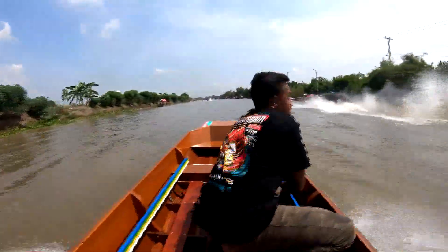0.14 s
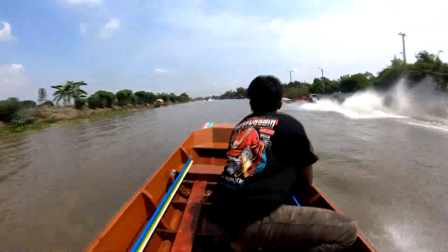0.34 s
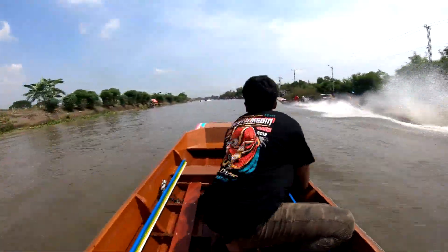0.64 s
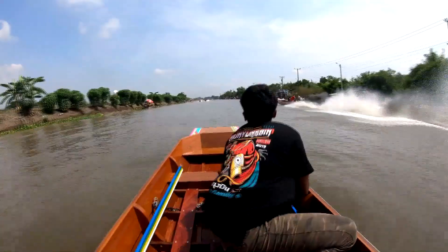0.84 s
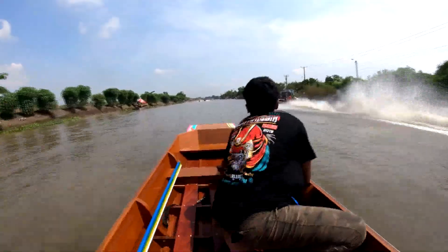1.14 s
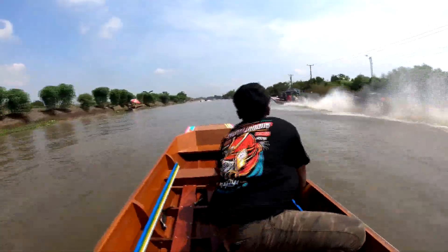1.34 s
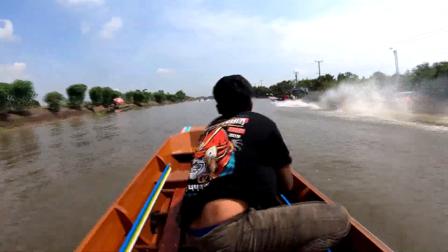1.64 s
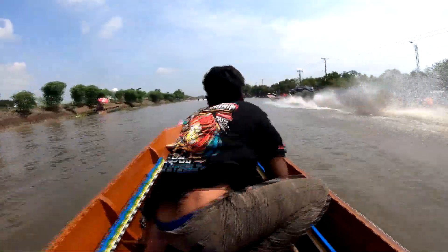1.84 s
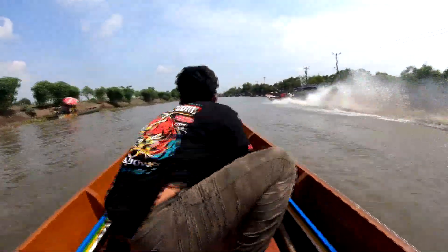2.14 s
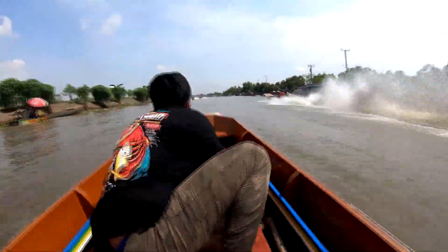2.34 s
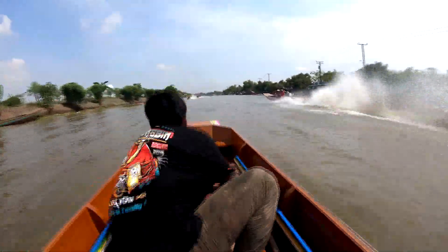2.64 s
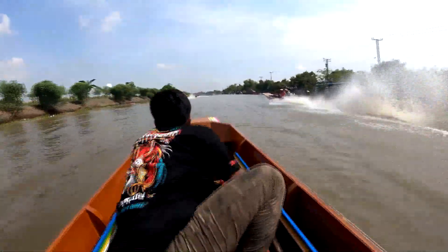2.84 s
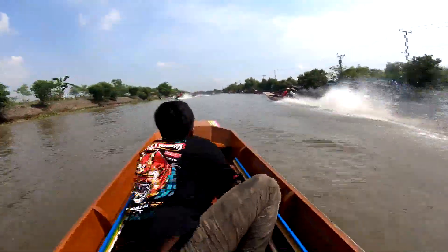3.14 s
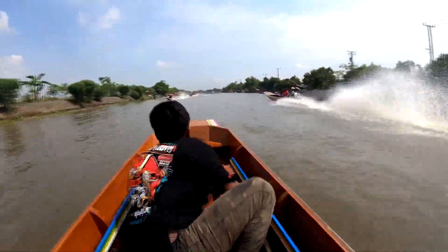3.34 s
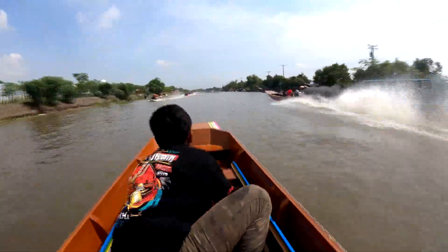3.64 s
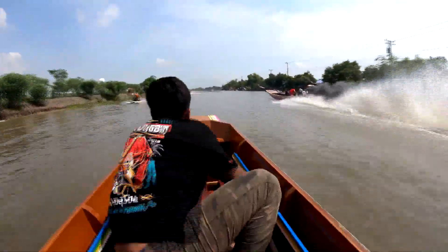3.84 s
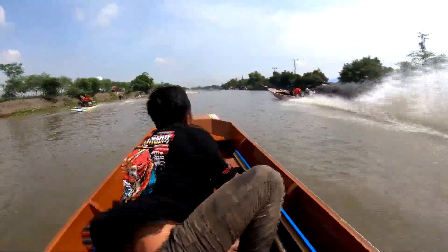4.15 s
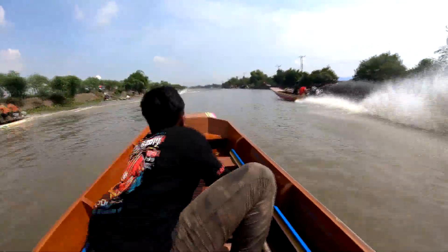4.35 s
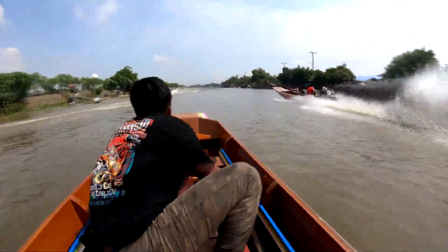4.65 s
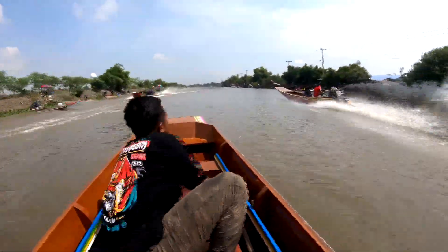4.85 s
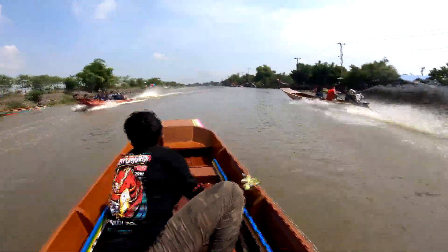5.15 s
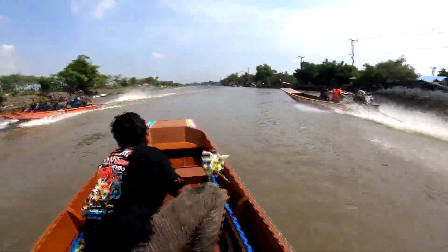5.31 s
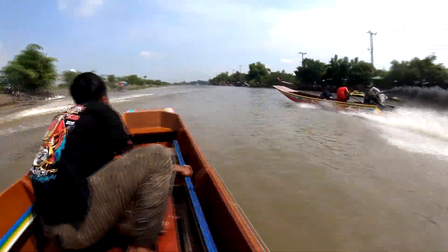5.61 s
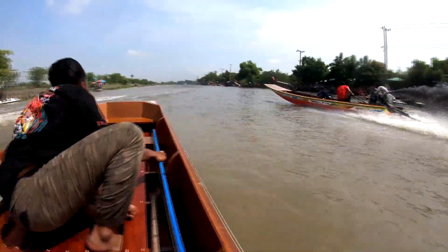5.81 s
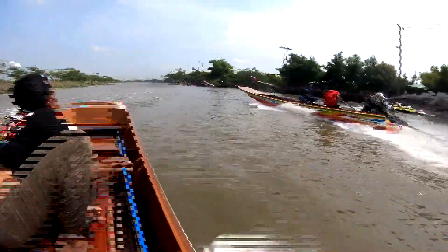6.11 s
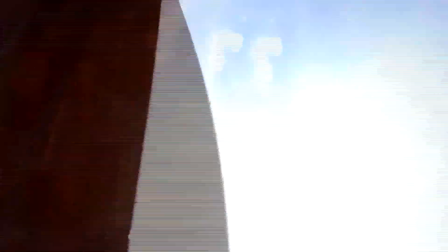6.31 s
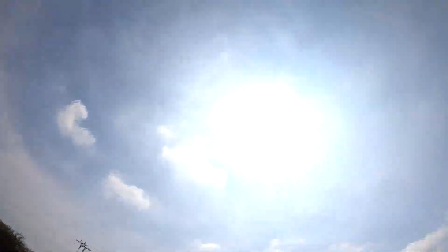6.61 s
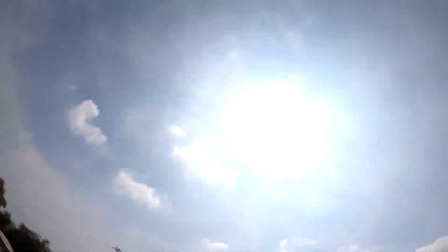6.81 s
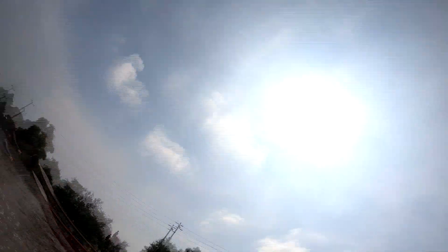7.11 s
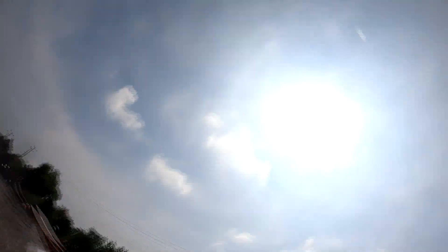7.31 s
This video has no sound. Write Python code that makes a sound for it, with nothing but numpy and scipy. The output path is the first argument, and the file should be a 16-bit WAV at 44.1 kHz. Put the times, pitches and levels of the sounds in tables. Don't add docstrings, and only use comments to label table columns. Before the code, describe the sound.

Close onboard microphone in an open wooden boat on a river. The engine climbs quickly in pitch and settles into a low, rough drone while a rival's higher buzz fades at once. Wind buffets and splutters, spray hisses in bursts, and hard clicks tick every half second. Near the end a wave knocks the microphone, the engine sags and fades, and wind roar and wash remain.

```python
import sys
import numpy as np
from scipy import signal
from scipy.fft import rfft, irfft, next_fast_len
from scipy.io import wavfile
from scipy.ndimage import uniform_filter1d, minimum_filter1d, map_coordinates

SR = 44100
rng = np.random.default_rng(int(sys.argv[2]) if len(sys.argv) > 2 else 0)


def generate_wav(signal):
    frames = np.transpose(np.atleast_2d(signal))
    scaled = np.clip(frames, -1, 1) * 32767
    pcm = np.round(scaled).astype(np.int16)
    wavfile.write(sys.argv[1], SR, pcm)


def magnitude_from_level(level_db):
    exponent = np.asarray(level_db, float) / 20
    return 10 ** exponent


N = 329427

# (time [s], roar level [dB])
WIND = [(0, -44.5), (.4, -44.5), (.65, -38), (1.1, -38.5), (1.55, -41), (2.15, -37.5), (2.65, -39.5),
        (3.0, -38.5), (3.5, -34.5), (4.1, -35.5), (4.65, -35.5), (5.15, -36.5), (5.5, -35), (6.1, -39.5),
        (6.57, -34), (6.85, -30.5), (7.1, -35), (7.47, -34.5)]
# (time [s], level [dB], share torn into mist [dB])
WATER = [(0, -46, -1.5), (.45, -43, -7.5), (.6, -39, -9.5), (1.5, -42, -7.5), (2.12, -40.5, -10),
         (2.5, -47, -10.5), (2.95, -48, -7.5), (3.45, -49.5, -3), (4.02, -52, -4), (4.43, -46, -9),
         (4.74, -45.5, -8), (5.01, -41.5, -9), (5.53, -37.5, -9), (5.8, -40.5, -5), (6.2, -40.5, -10.5),
         (6.9, -39, -15.5), (7.41, -35, -14.5), (7.47, -42, -7)]
# (time [s], frequency [Hz])
EDGE = [(0, 7500), (2.7, 7160), (2.95, 4098), (4.1, 4079), (4.4, 4540), (4.75, 4600), (4.95, 7070),
        (5.65, 7360), (5.8, 5810), (6.2, 5260), (6.7, 4383), (7.17, 3740), (7.19, 4525), (7.3, 4660),
        (7.47, 4460)]
# (frequency [Hz], density [dB per Hz])
FLUTTER = [(100, -34.5), (170, 0), (269, -6.5), (381, -13.5), (501, -25), (549, -38), (600, -37),
           (780, -64), (1320, -120)]
# (frequency [Hz], density [dB per Hz])
HOUSING = [(330, -37.5), (560, -30), (618, -4.5), (766, 0.5), (948, -4.5), (1120, -18), (1240, -8.5),
           (1420, -5.5), (1760, -5), (2570, -13), (2810, -18), (4000, -19), (5200, -47), (8800, -120)]
# (frequency [Hz], density [dB per Hz])
SPRAY = [(1650, -30), (2800, -7), (3170, -9), (3810, -3.5), (4080, -2.5), (4740, -3.5), (6040, -4),
         (7600, -12), (9880, -39), (16700, -120)]
MEAN_WIND_DB = -38
SHELTER_S, SHELTER_DB, SHELTER_IN_S, SHELTER_OUT_S = (6.2, 6.42), -9.5, .015, .05


def unit(x):
    return x / np.sqrt(np.mean(x ** 2) + 1e-20)


def along(points, hz):
    f, v = np.transpose(points)
    return np.interp(np.log(hz + 1), np.log(f + 1), v)


def curves(rows):
    s, *cols = np.transpose(rows)
    return [np.interp(np.arange(N) / SR, s, c) for c in cols]


def wobble(rate):
    at = np.arange(0, N + 32, 32)
    knots = rng.standard_normal(int(N * rate / SR) + 4)
    return np.interp(np.arange(N), at, map_coordinates(knots, [at * rate / SR]))


def coloured(x, spectrum):
    m = next_fast_len(len(x) + 8192)
    response = magnitude_from_level(along(spectrum, np.fft.rfftfreq(m, 1 / SR)))
    return irfft(rfft(x, m) * response, m)[:len(x)]


def rush(spectrum, patchy_db):
    z = signal.stft(rng.standard_normal(N), nperseg=512)[2]
    field = uniform_filter1d(rng.standard_normal(z.shape), size=8, axis=0)
    field = uniform_filter1d(field, size=6, axis=1)
    patches = signal.istft(z * magnitude_from_level(patchy_db * unit(field)), nperseg=512)[1][:N]
    return unit(coloured(patches, spectrum))


def between(start_s, end_s, in_s, out_s):
    t = np.arange(N) / SR
    return np.clip((t - start_s) / in_s, 0, 1) * np.clip(1 - (t - end_s) / out_s, 0, 1)


def shelter_db():
    return SHELTER_DB * between(*SHELTER_S, SHELTER_IN_S, SHELTER_OUT_S)


def edge_octaves(s):
    return np.log2(np.interp(s, *np.transpose(EDGE)) / 4000)


def rival():
    # (time [s], exhaust frequency [Hz], level [dB])
    exhaust = [
        (0, 313, -31),
        (.1, 294.3, -32),
        (.26, 283, -26.5),
        (.32, 268, -52),
        (.45, 276, -68),
    ]
    hz, level_db = curves(exhaust)
    turn = 2 * np.pi * np.cumsum(hz) / SR
    return magnitude_from_level(level_db + 2) * (np.sin(turn) + magnitude_from_level(-17) * np.sin(3 * turn / 2))


def water():
    # (frequency [Hz], density [dB per Hz])
    mist_spectrum = [(3500, -30), (4300, 3.5), (6000, -5), (7300, -8), (7700, -2), (8500, -6), (8800, -10),
                     (9700, -13.5), (10300, -25.5), (11500, -26.5), (13000, -48.5)]
    spray_loss_db, spray_back_s = -10.5, 0.25
    spray_db, share_db = curves(WATER)
    turned = between(SHELTER_S[0], SHELTER_S[0] + SHELTER_IN_S, SHELTER_IN_S, spray_back_s)
    spray_db = spray_db + spray_loss_db * turned
    mist_db = spray_db + share_db
    spray = unit(magnitude_from_level(1.3 * wobble(7.4) + 1.3 * wobble(30)) * rush(SPRAY, patchy_db=1.0))
    hz, t, z = signal.stft(magnitude_from_level(spray_db + 2.5) * spray, SR, nperseg=512)
    edge_hz = np.interp(t, *np.transpose(EDGE))
    spray = signal.istft(z / (1 + (hz[:, None] / edge_hz) ** 40), SR, nperseg=512)[1][:N]
    mist = unit(magnitude_from_level(wobble(25) + wobble(9.9)) * rush(mist_spectrum, patchy_db=2))
    return spray + magnitude_from_level(mist_db) * mist


def sheets():
    # (time [s], peak level [dB], length [s])
    sheet_events = [(0.085, -30, 0.01), (0.25, -32.5, .033), (0.548, -37, .23), (.984, -33, 0.048),
                    (1.045, -33.5, 0.036), (1.153, -34, 0.018), (1.437, -34.5, 0.041), (1.566, -31, 0.066),
                    (1.654, -33, 0.1), (1.819, -29, 0.045), (2.029, -33, .037), (2.226, -41, 0.015),
                    (3.1, -38.5, 0.021), (3.28, -40.5, .03), (3.774, -45, .057), (4.074, -36, .03),
                    (4.263, -36.5, 0.022), (4.33, -37.5, 0.029), (4.46, -41, .015), (4.762, -37.5, .02),
                    (4.835, -29, 0.0076), (4.877, -35, .012), (5.923, -37, .037), (6.136, -35, 0.021),
                    (6.85, -45, .015), (6.925, -49, .06), (7.197, -32.5, 0.014), (7.204, -44, 0.12),
                    (7.302, -51, 0.25)]
    # (time [s], peak level [dB], length [s], centre [Hz])
    veils = [
        (.3, -62, .3, 9800),
        (0.545, -53, 0.23, 11500),
        (6.187, -42, .012, 9200),
        (6.188, -23, .012, 5060),
        (6.19, -25.5, .01, 2570),
        (7.23, -60, .13, 10300),
        (7.192, -39.5, 0.25, 5170),
    ]
    sheet_hz, sheet_follows = 5500, 0.026
    out = np.zeros(N + SR)

    def centre_hz(s):
        return sheet_hz * (1 + sheet_follows * (np.interp(s, *np.transpose(WATER)[:2]) + 44))

    for s, db, length, hz in [(*row, centre_hz(row[0])) for row in sheet_events] + veils:
        u = np.linspace(0, 1, round(length * SR))
        band = [(hz * .5, -90), (hz * .7, -25), (hz * .88, -3), (hz, 0),
                (hz * 1.15, -4), (hz * 1.4, -30), (hz * 1.7, -110)]
        hiss = unit(coloured(rng.standard_normal(len(u) + 2048), band))[:len(u)]
        out[round(s * SR):][:len(u)] += magnitude_from_level(db - 4.5) * np.sin(np.pi * u ** .6) * hiss
    return out[:N]


def slaps():
    # (time [s], peak level [dB])
    slap_events = [(1.2165, -21), (1.9665, -22), (2.0617, -20), (2.1813, -19.5), (2.2123, -25),
                   (2.279, -30), (3.722, -15.5), (3.7469, -22), (3.7961, -21), (3.8448, -23), (3.883, -23),
                   (3.905, -14), (3.948, -15.5), (4.003, -27), (4.045, -24), (4.079, -15), (4.132, -18.5),
                   (4.1662, -25), (4.2267, -23), (4.344, -25), (4.548, -28), (4.6671, -19), (4.6997, -21),
                   (4.746, -24), (6.19, -18.5), (6.554, -22), (6.5822, -23), (6.635, -22), (6.6892, -24),
                   (6.7486, -21)]
    # (frequency [Hz], gain [dB])
    slap_colour = [(500, -6.5), (1200, -2), (1800, 1.5), (3000, 1), (4500, -2)]
    # (frequency [Hz], gain [dB])
    wet_colour = [(4500, 1), (6000, -4), (7500, -19)]
    rise_s = .002
    wet_db, wet_per_octave_db = -26.5, 23.5
    patter_rate, patter_over_roar_db = 5.5, 5.5
    low, high = np.zeros(N + SR), np.zeros(N + SR)
    t = np.arange(SR // 25) / SR
    when, size = rng.random((60, 2)).T
    when = np.cumsum(-np.log(1 - when)) / patter_rate
    exposed_db = curves(WIND)[0] + 2 * shelter_db()
    patter_db = np.interp(when * SR, np.arange(N), exposed_db) + patter_over_roar_db + 6 * size
    patter = [row for row in zip(when, patter_db) if row[0] < N / SR]
    for s, db in slap_events + patter:
        treble_db = wet_db + wet_per_octave_db * edge_octaves(s)
        puff = magnitude_from_level(db) * (t / rise_s * np.exp(1 - t / rise_s)) ** 2
        low[round(s * SR):][:len(t)] += puff
        high[round(s * SR):][:len(t)] += puff * magnitude_from_level(treble_db)
    flap = uniform_filter1d(low[:N], size=600) * magnitude_from_level(shelter_db()) * rush(FLUTTER, patchy_db=-3)
    body = coloured(low[:N] * rush(HOUSING, patchy_db=1.0), slap_colour)
    wet = coloured(high[:N] * rush(SPRAY, patchy_db=3.0), wet_colour)
    return magnitude_from_level(-5) * body + magnitude_from_level(-3.0) * wet + magnitude_from_level(14.5) * flap


def wind():
    # (frequency [Hz], density [dB per Hz])
    buffet_spectrum = [(12, -42.5), (20, -4), (69, 3), (113, 2), (135, 1.5), (162, -9), (190, -7.5),
                       (250, -30), (420, -120)]
    # (time [s], level over the steady wind [dB], half width [s])
    gusts = [(.33, -5.5, 0.029), (.475, 12, .02), (0.529, -5.5, 0.033), (.6, 2.5, .02), (1.41, 4, 0.027),
             (1.8, -2.5, 0.027), (1.84, 3.5, 0.03), (2.121, 4, 0.025), (2.21, 8.5, 0.027),
             (2.291, 4.5, 0.017), (2.68, -5.5, 0.032), (3.49, 16, 0.013), (3.8, 4, 0.13), (4.21, -4, .05),
             (4.36, -7.5, .03), (4.41, 3.5, 0.041), (4.7, -3, 0.15), (4.83, 4, 0.028), (4.9, -5, 0.023),
             (4.96, 1, 0.018), (5.12, 3.5, 0.013), (5.19, -4.5, 0.06), (5.8, 5.5, 0.44),
             (6.605, -6.5, 0.012), (6.67, 4, .03), (6.714, -8, .01), (6.79, -5, 0.014), (6.85, 0.5, .03),
             (7.225, -4, 0.015), (7.44, 2, 0.023)]
    buffet_mean_db, buffet_grows, buffet_gusts = -15.5, 0.2, .6
    flutter_mean_db, flutter_grows, flutter_shelter = -21, 0.67, 1.05
    roar_gusts, roar_lulls = 0.21, 0.48
    strength_db, = curves(WIND)
    over_mean_db = strength_db - MEAN_WIND_DB
    t = np.arange(0, N / SR, 1 / 500)
    bumps_db = sum(db * np.exp(-((t - s) / width) ** 2) for s, db, width in gusts)
    gust_db, = curves(np.transpose([t, bumps_db]))
    buffet_db = buffet_mean_db + buffet_grows * over_mean_db + buffet_gusts * gust_db + shelter_db()
    flutter_db = flutter_mean_db + flutter_grows * over_mean_db + gust_db + flutter_shelter * shelter_db()
    roar_db = strength_db + np.where(gust_db > 0, roar_gusts, roar_lulls) * gust_db + shelter_db()
    eddy = wobble(22) + wobble(50)
    buffet = unit(magnitude_from_level(0.94 * wobble(11)) * rush(buffet_spectrum, patchy_db=0.3))
    flutter = unit(magnitude_from_level(1.67 * eddy) * rush(FLUTTER, patchy_db=0.5))
    roughness = np.clip((roar_db + 50) / 5, 1, 3.2)
    splutter = magnitude_from_level(roughness * (.9 * wobble(110) + .35 * wobble(30)))
    roar = unit(splutter * magnitude_from_level(0.21 * eddy) * rush(HOUSING, patchy_db=-0.5))
    return magnitude_from_level(buffet_db) * buffet + magnitude_from_level(flutter_db) * flutter + magnitude_from_level(roar_db) * roar


def engine():
    # (time [s], firing rate [Hz], firing tone level [dB])
    firing = [(0, 103.9, -21.5), (.3, 116.1, -21.5), (.42, 121.4, -26), (.74, 137.9, -21.5),
              (.86, 142.5, -16.5), (1, 146.9, -17.5), (1.5, 152.5, -17.5), (2.2, 155.9, -19.5),
              (2.9, 155.5, -17.5), (3.76, 159.1, -16.5), (3.9, 159.5, -22), (4.7, 163.8, -25),
              (5.9, 162.8, -20), (6.25, 164, -26.5), (6.4, 147.3, -17), (6.5, 137.8, -30), (7.47, 130, -36)]
    # (multiple of firing rate [1], level under the tone [dB])
    order_levels = [
        (.5, -14),
        (1.5, -20),
        (2, -20),
        (3, -34),
    ]
    whine_s, whine_db, whine_rest_db, whine_fade_s = (0.346, 0.738), -47, -61, .05
    firing_hz, tone_db = curves(firing)
    pull = between(*whine_s, whine_fade_s, whine_fade_s)
    sixth_db = whine_rest_db + (whine_db - whine_rest_db) * pull
    turn = 2 * np.pi * np.cumsum(firing_hz * (1 + wobble(14) / 400)) / SR
    orders = sum(magnitude_from_level(db + 2.1 * wobble(12)) * np.sin(k * turn + 1.1 * wobble(9)) for k, db in order_levels)
    tone = magnitude_from_level(wobble(11)) * np.sin(turn) + orders
    whine = magnitude_from_level(sixth_db + 1.5 * wobble(20)) * np.sin(6 * turn)
    return np.sqrt(2) * (magnitude_from_level(tone_db) * tone + whine)


def scene():
    return (rival() + water() + sheets() + slaps() + wind() + engine())[None]


def limited(x):
    need = np.minimum(1, .82 / (np.abs(x) + 1e-9))
    return x * uniform_filter1d(minimum_filter1d(need, size=800), size=400)


def treble_dropouts(x):
    # (middle [s], length [s], lowest lost frequency [Hz])
    gaps = [(1.178, 0.027, 7000), (1.395, 0.016, 7000), (3.659, .03, 5500), (3.845, .013, 5600),
            (4.036, 0.019, 4300), (4.143, .012, 5400), (4.718, 0.009, 5500), (4.972, 0.019, 6800),
            (6.042, .014, 5800), (6.454, 0.03, 5400), (6.724, 0.018, 5400), (6.897, .013, 4800),
            (7.091, 0.015, 4600), (7.368, .017, 5600), (7.401, 0.0092, 5600)]
    ceiling_hz, ceiling_hz_per_db, ceiling_ragged_hz = 12300, 290, 700
    haze_db = -17
    hz, t, z = signal.stft(x, SR, nperseg=256)
    keep = np.ones(z.shape)
    for s, length, low_hz in gaps:
        keep *= 1 - (hz[:, None] > low_hz) * np.clip(2 - 2.4 * np.abs(t - s) / length, 0, 1) * 0.83
    ragged = np.repeat(rng.standard_normal(len(t)), repeats=8)[:len(t)]
    spray_db = np.interp(t, *np.transpose(WATER)[:2])
    top_hz = ceiling_hz + ceiling_hz_per_db * (spray_db + 43.5) + ceiling_ragged_hz * ragged
    haze = magnitude_from_level(haze_db + 7 * np.repeat(rng.standard_normal(len(t)), repeats=8)[:len(t)])
    keep *= haze + (1 - haze) / (1 + (hz[:, None] / top_hz) ** 60)
    return signal.istft(z * keep, SR, nperseg=256)[1][:N]


def lost_buffers():
    jumps = [-0.18, .83, 0.35, 0.27, 0.14, 0.71, -.3, -.07, -0.14, -.069, -0.5, -0.27, 0, -.36]
    first_loss_s, loss_every_s, decay_s = .3186, .512, .0012
    out, t = np.zeros(N), (np.arange(-600, 600) + .5) / SR
    for s, jump in zip(first_loss_s + loss_every_s * np.arange(len(jumps)), jumps):
        out[round(s * SR) - 600:][:len(t)] += jump / 2 * np.sign(t) * np.exp(-np.abs(t) / decay_s)
    return out


def roll_off(x):
    return signal.sosfilt(signal.butter(12, 16000, fs=SR, output="sos"), x)


def record(dry):
    joined = treble_dropouts(limited(dry[0])) + lost_buffers()
    band_limit = [(15700, -1), (16000, -14), (16300, -30), (16700, -40.5), (16800, -88)]
    mix = coloured(joined, band_limit)[None]
    return roll_off(mix)


dry = scene()
out = record(dry)
generate_wav(out)
```